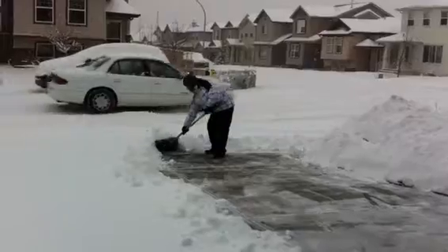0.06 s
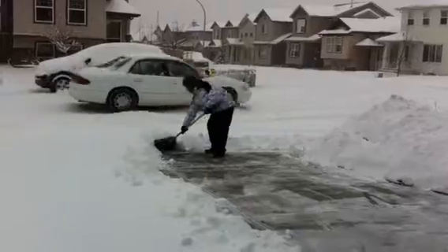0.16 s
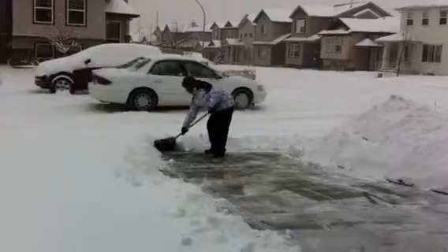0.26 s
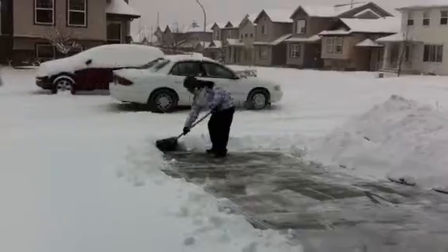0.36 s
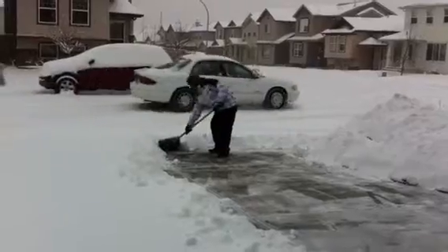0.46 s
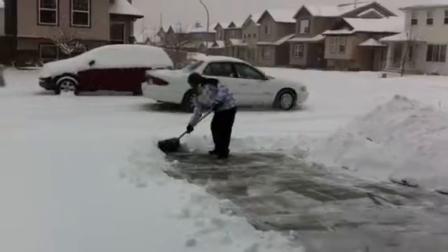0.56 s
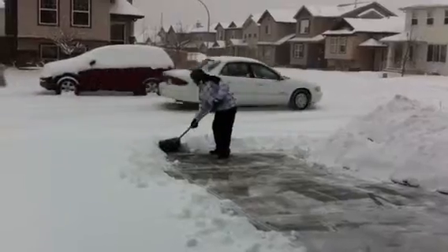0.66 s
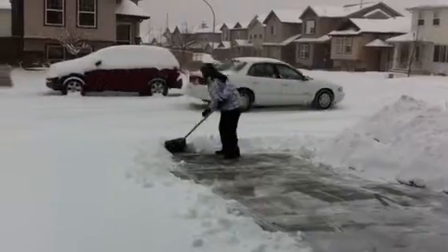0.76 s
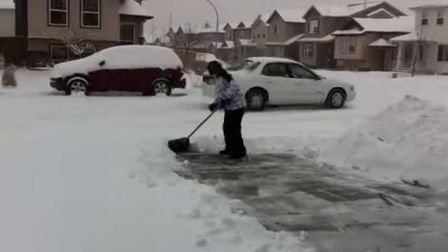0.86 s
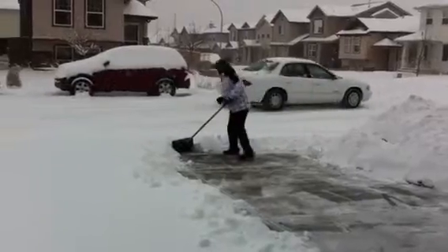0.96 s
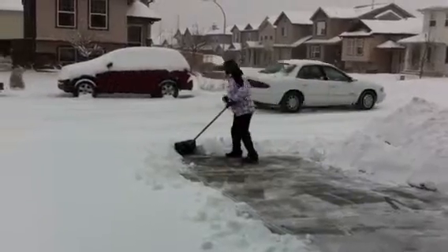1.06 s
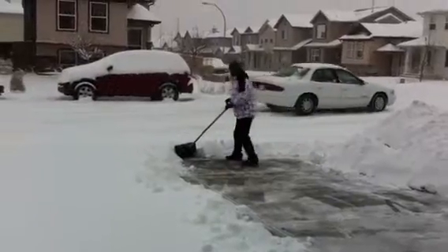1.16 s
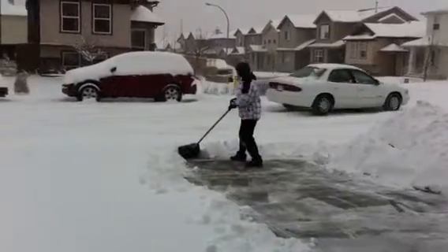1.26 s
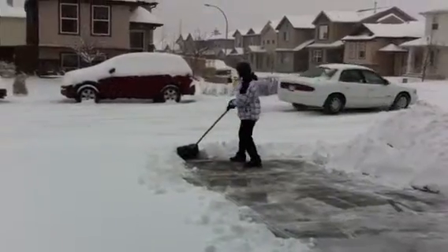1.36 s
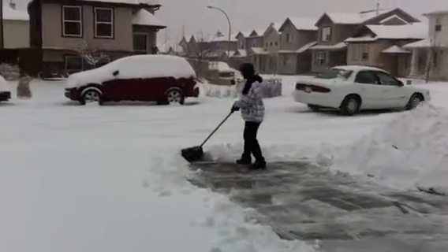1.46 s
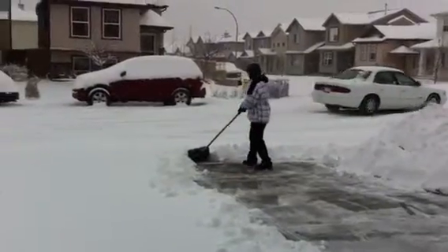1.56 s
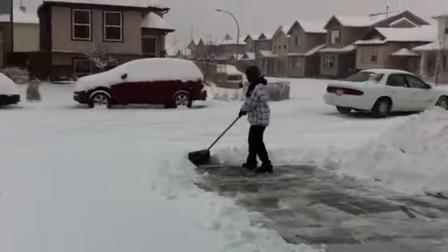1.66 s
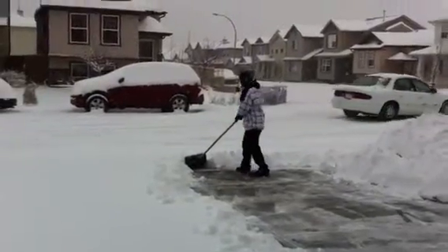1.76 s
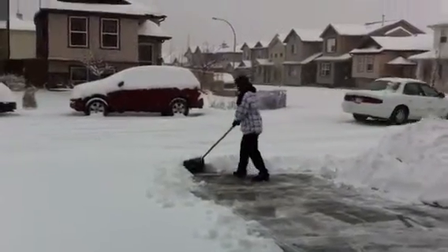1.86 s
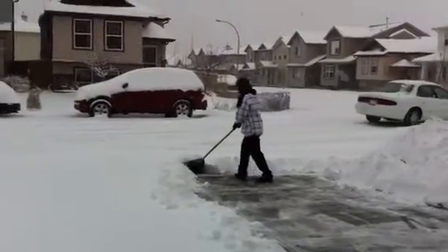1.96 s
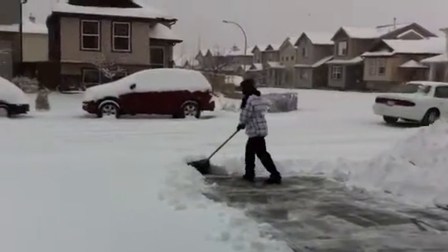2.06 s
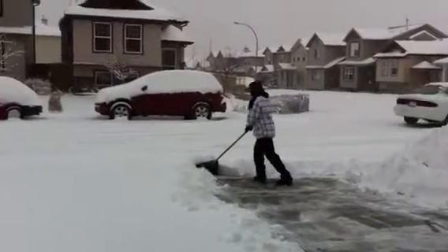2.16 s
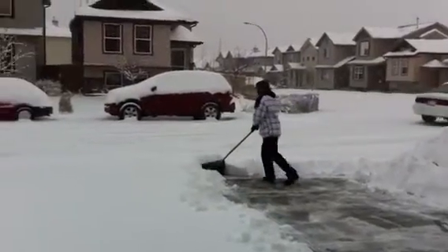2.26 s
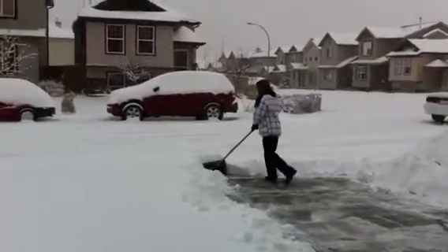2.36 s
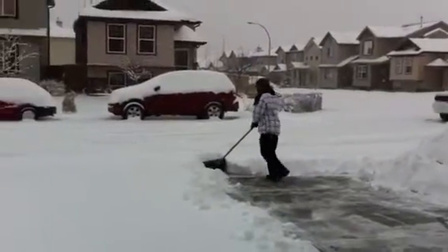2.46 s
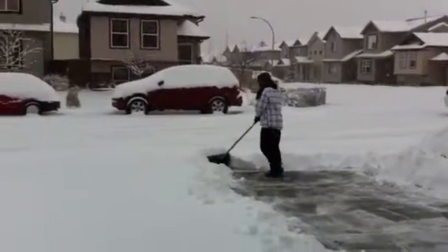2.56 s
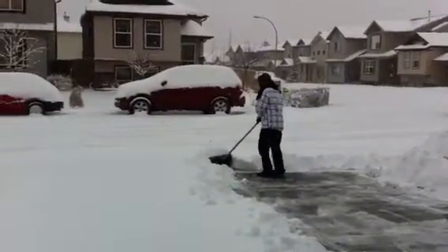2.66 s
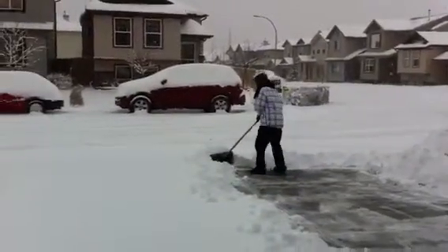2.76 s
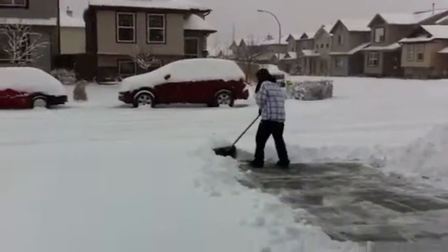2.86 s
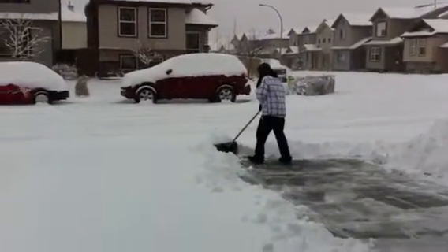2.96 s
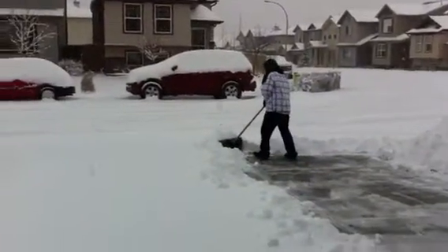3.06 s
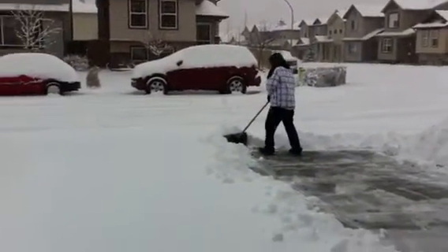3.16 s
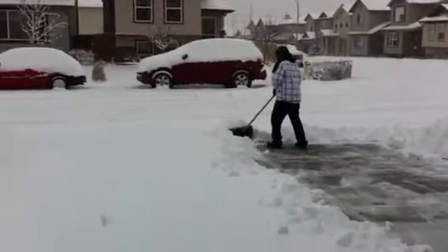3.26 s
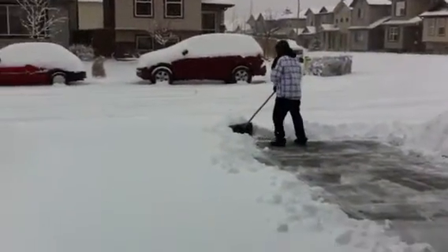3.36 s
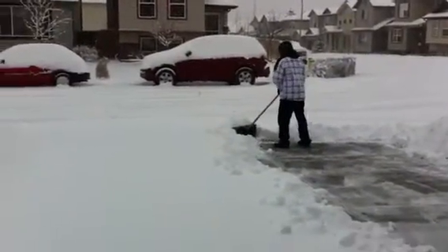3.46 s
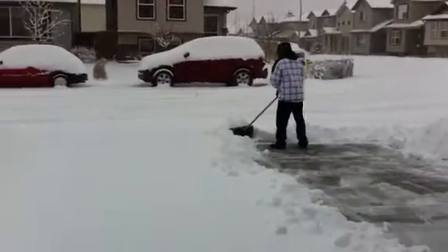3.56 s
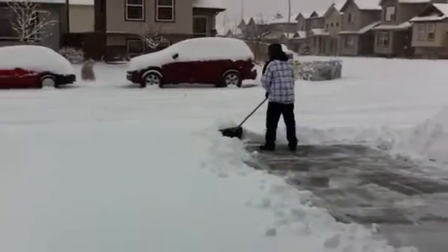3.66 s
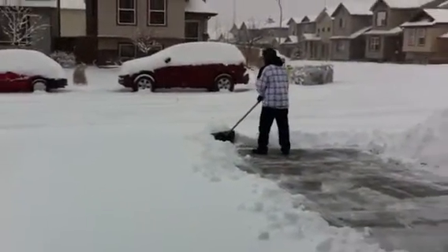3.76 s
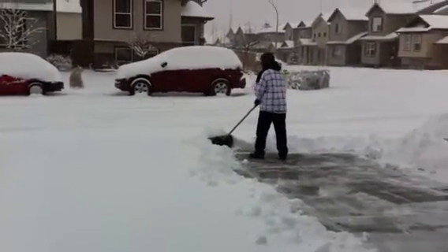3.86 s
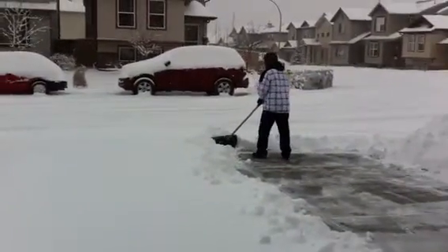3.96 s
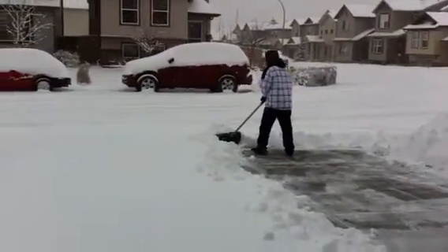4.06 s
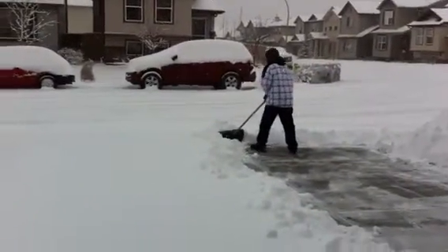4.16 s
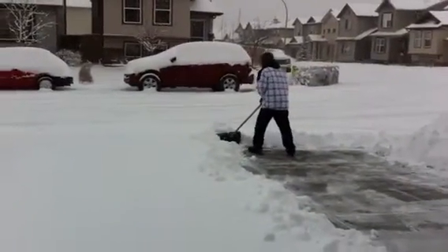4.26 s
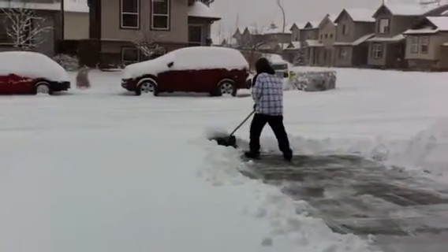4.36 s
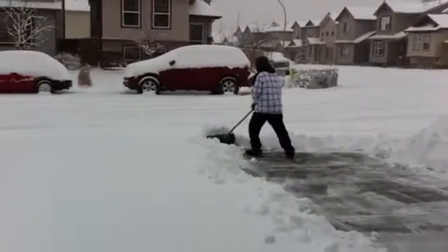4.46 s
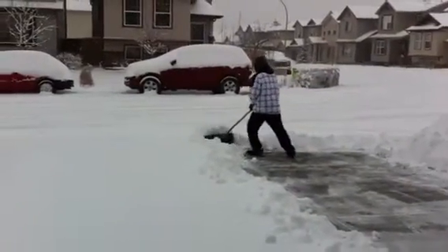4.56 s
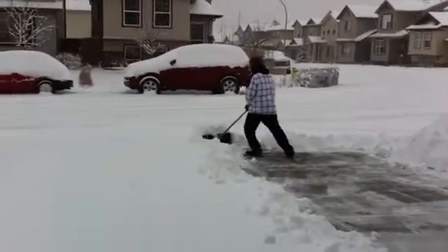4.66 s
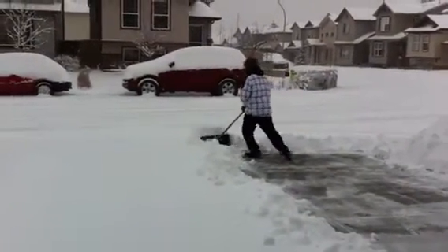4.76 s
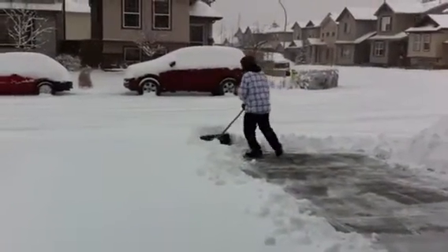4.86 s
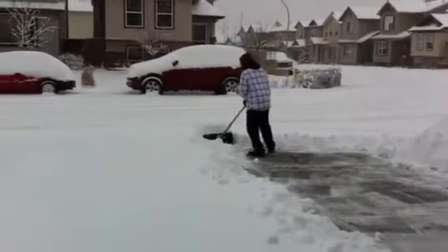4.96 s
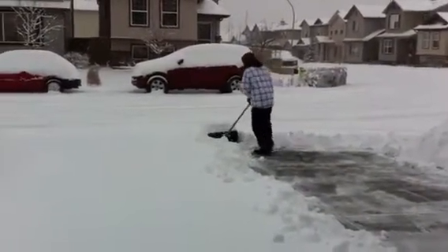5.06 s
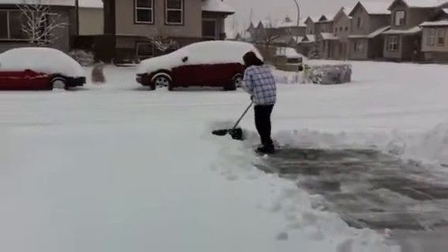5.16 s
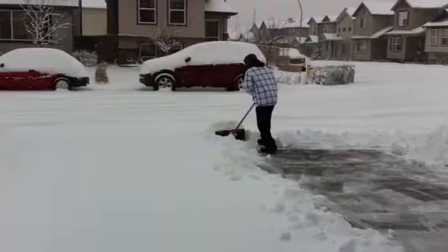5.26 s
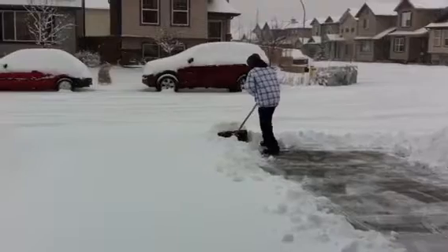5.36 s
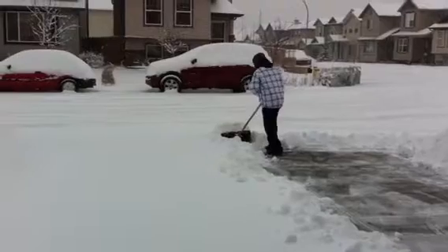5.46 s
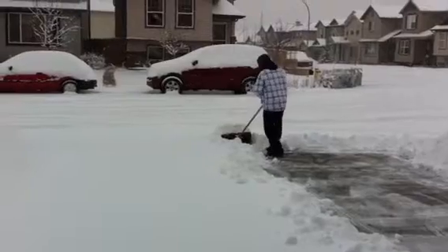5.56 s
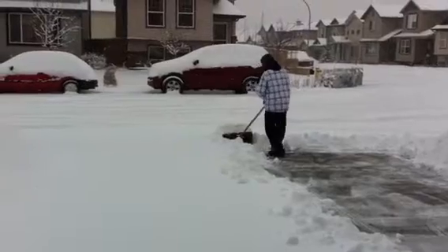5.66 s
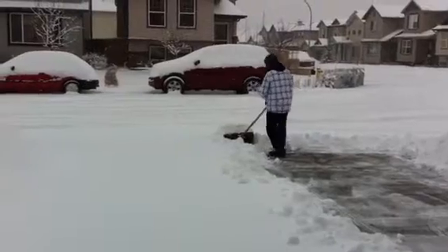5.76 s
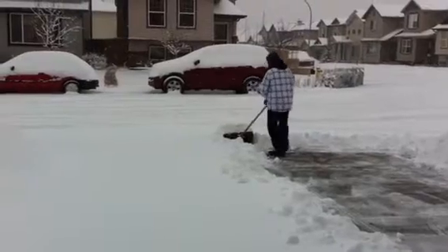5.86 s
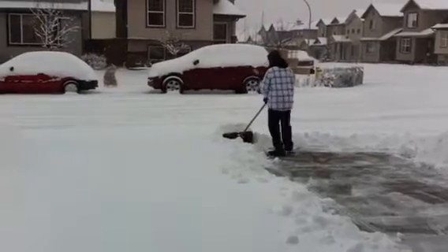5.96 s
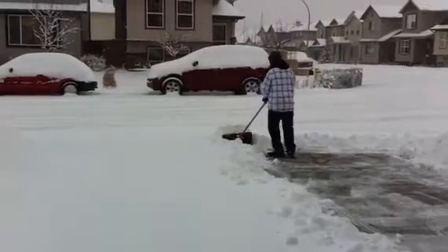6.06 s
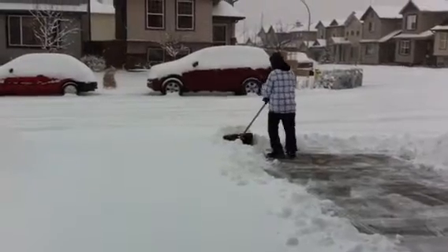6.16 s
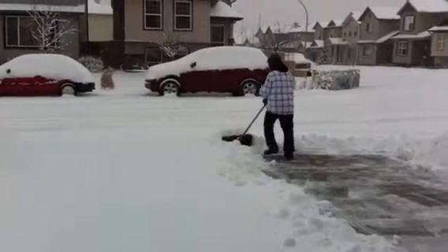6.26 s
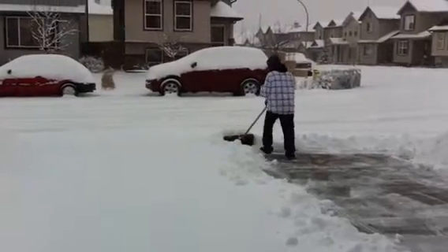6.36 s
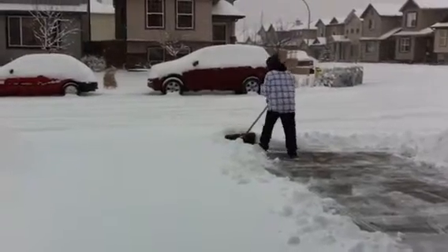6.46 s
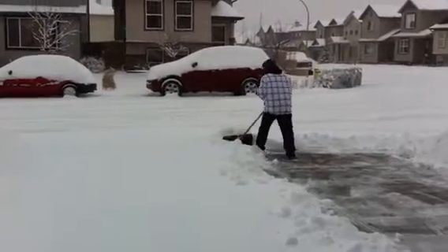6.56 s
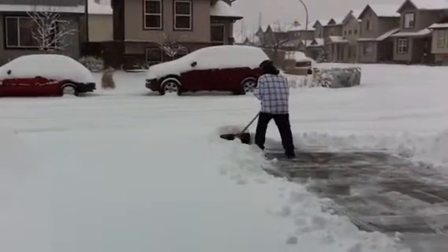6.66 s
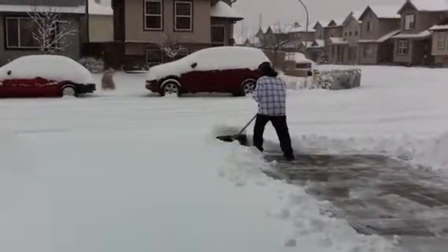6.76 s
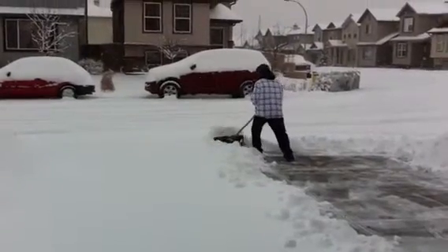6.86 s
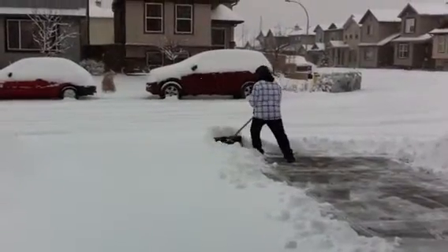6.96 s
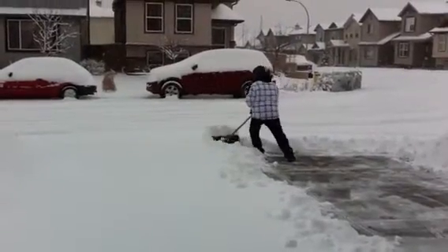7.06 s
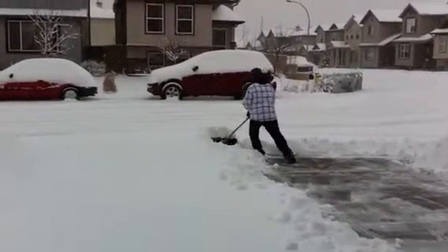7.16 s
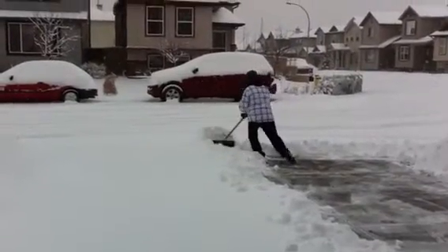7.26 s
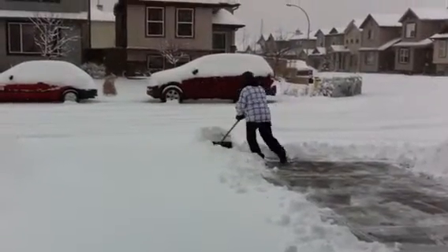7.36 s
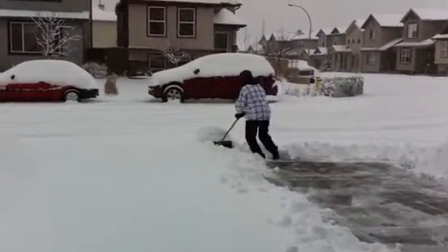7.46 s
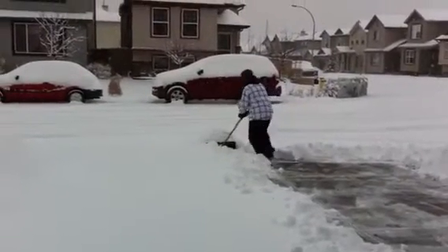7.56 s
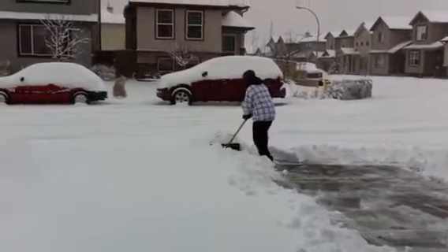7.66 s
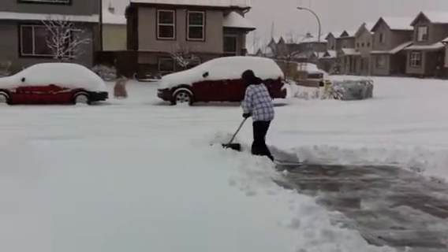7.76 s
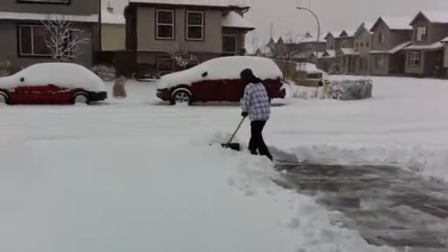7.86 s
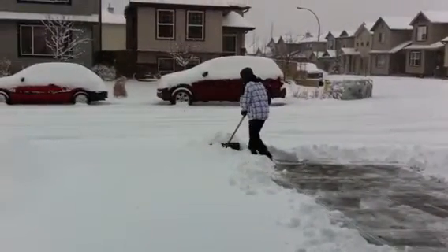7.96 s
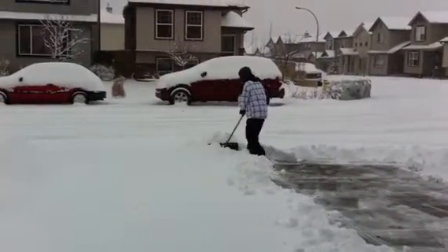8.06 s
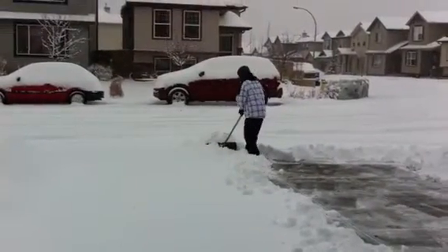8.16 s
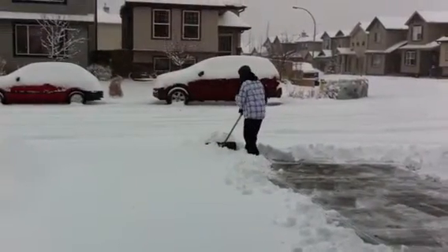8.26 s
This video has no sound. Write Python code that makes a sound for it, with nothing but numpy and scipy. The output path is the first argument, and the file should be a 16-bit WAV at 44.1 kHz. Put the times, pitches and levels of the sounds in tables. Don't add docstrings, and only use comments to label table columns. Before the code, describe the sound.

Outdoors in a snowy residential street, a plastic shovel with a steel edge scrapes rough paving some metres away. A loud, bright stroke is already under way and quickly fades. Small scuffs lead to a longer middle push with knocks and thuds, then a weaker drag. After quiet gaps come two more heavy, laden pushes. A faint street hum, a receding car and small-microphone hiss lie underneath.

```python
import sys
import numpy as np
from scipy import signal
from scipy.fft import rfft, irfft, next_fast_len
from scipy.io import wavfile
from scipy.ndimage import uniform_filter1d, minimum_filter1d, map_coordinates

SR = 44100
rng = np.random.default_rng(int(sys.argv[2]) if len(sys.argv) > 2 else 0)


def volts_from_db(level):
    exponent = np.asarray(level, float) / 20
    return 10 ** exponent


def generate_wav(signal):
    frames = np.transpose(np.atleast_2d(signal))
    scaled = np.clip(frames, -1, 1) * 32767
    pcm = np.round(scaled).astype(np.int16)
    wavfile.write(sys.argv[1], SR, pcm)


N = 366987

# frequency in Hz, width in Hz, height in dB.
RING = [(214, 130, -4), (785, 37, 7.5), (931, 190, 7.5), (1540, 80, 2.5)]
# frequency in Hz, width in Hz, height in dB.
STRIP = [(3890, 170, 3.5), (5160, 1400, 2.5), (5230, 300, 2.5), (6200, 200, 0.5), (8400, 450, 3.5),
         (11000, 630, 2), (13100, 690, 2)]


def scrape():
    # frequency in Hz, level in dB per Hz.
    edge = [(1650, -21), (2800, -1.5), (4290, -2.5), (5570, 0), (6870, -3.5), (8480, -4), (12600, -6.5),
            (15800, -11.5)]
    blade = [(1050, -45.5), (1350, -1), (1550, 2), (2400, 1), (2550, -4), (3200, -40)]
    panel = [(350, -38.5), (550, 2.5), (900, -5.5), (1250, 1), (1700, -35)]
    scoop = [(15, -64), (25, -35), (69, -29.5), (141, -3.5), (172, -1), (240, 3), (419, -9), (550, -10),
             (720, -49), (1210, -120)]
    force = unit(grit(rate=900, spread_db=2.0, clump_db=0.3, life=0.0022))
    levels = contact()
    levels[3] = minimum_filter1d(levels[3], size=1500)
    speed_db = 20 * np.log10(levels[0])
    snow_shares, patches_db = (1.26, 1.34, 1.7, 1.15), (2.0, 2.3, 1.75, 1.9)
    out = np.zeros(N)
    for gain, spectrum, snow, patch_db in zip(levels, (edge, blade, panel, scoop), snow_shares, patches_db):
        drive = patches(force + snow * rng.standard_normal(N), patch_db, wide=5, long=9)
        shaken = coloured(drive, spectrum, RING)
        out += gain * unit(regain(shaken, lambda hz, t: ringing(hz, t, speed_db)))
    return out


def grit(rate, spread_db, clump_db, life):
    slips = rng.random(N) < rate / SR
    sizes = slips * volts_from_db(spread_db * np.minimum(rng.exponential(size=N), 3))
    rasp = signal.lfilter([1], [1, -np.exp(-1 / (life * SR))], sizes)
    clumps = volts_from_db(clump_db * (wobble(25) + 0.89 * wobble(90)))
    return rasp * rng.standard_normal(N) * clumps


def contact():
    # time in s, sliding speed in dB, blade flex in dB, snow load in dB.
    first_pushes = [
        [(2.74, -78, 10, -2), (2.8, -67, 7, 2), (2.94, -68, 8, 4), (3.0, -73, 9, 6)],
        [(1.43, -79, 7, 0), (1.48, -68.5, 12, -3), (1.61, -72.5, 11, -7), (1.66, -82, 12, 0),
         (1.75, -88, 14, 0)],
        [(0.004, -37.5, -6, 0), (0.026, -32.5, -1.5, -11.5), (0.11, -36.5, 6, -5.5), (0.172, -40.5, 1, -7),
         (0.214, -36, -1.5, -10.5), (0.26, -36.5, -2.5, -6.5), (0.422, -57, -1.5, -5), (0.506, -68, -1, -12),
         (0.62, -76, 0, 3)],
        [(1.8, -70, -17, -14), (1.88, -63.5, -5, -2), (1.959, -46.5, -5.5, -1.5), (2.007, -43.5, -4.5, -6.5),
         (2.315, -45, 3.5, -0.5), (2.44, -46, 2.5, -3.5), (2.515, -46.5, 3.5, -9), (2.633, -62, 0.5, -1),
         (2.68, -54, 1, -5)],
        [(3.006, -54, 12, 9), (3.025, -60, 8, 4.5), (3.068, -49.5, -1, -1), (3.174, -56, -0.5, -1.5),
         (3.354, -89, -5, 12)],
    ]
    # time in s, sliding speed in dB, blade flex in dB, snow load in dB.
    later_pushes = [
        [(4.33, -62, 6, 14), (4.345, -51, -15, 3), (4.394, -48, 0, 2), (4.46, -47, 1.5, 0),
         (4.584, -39.5, 0.5, -1.5), (4.654, -48, 2.5, 4), (4.8, -54, 0, -3), (4.88, -58, -1, -1),
         (5.09, -84, 4, 2)],
        [(6.6, -75, -4, 3), (6.68, -58, -1.5, 9), (6.756, -52.5, -2, -0.5), (6.828, -56.5, -1, 7),
         (6.855, -46, 4.5, -2), (6.963, -50, -2, 1.5), (7.001, -45, 0.5, -0.5), (7.17, -50, 0.5, 3),
         (7.52, -68.5, -11, 5.5)],
    ]
    # start in s, edge in dB, blade flex in dB, snow load in dB, fall in dB per s.
    scuffs = [(0.43, -56, -7, -8, 150), (1.07, -65.5, -5, 2, 75), (1.268, -52.5, -17, -12, 79),
              (1.347, -65, 4, 2, 80), (1.474, -53, -10, -16, 400), (1.49, -56.5, -10, -7, 83),
              (1.768, -54.5, -4, -21, 90), (2.662, -51.5, 4.5, -12, 38), (1.895, -57, -10, -10, 60),
              (3.808, -62, 5.5, -18, 200), (7.28, -62, -20, -20, 60), (2.672, -50, 6, -25, 110),
              (3.442, -59, 0.5, -22, 83), (3.48, -59.5, 1.5, -18, 217), (3.774, -62.5, -1, -6, 70),
              (3.788, -57, 4, -12, 162), (4.11, -66.5, -3, 13, 110), (4.05, -67.5, 0, 2.5, 20),
              (4.865, -61.5, 4.5, 4, 102), (5.1, -79, 6, 4, 100), (6.178, -59.5, -6, -16, 160),
              (6.22, -65, -1, -4, 39), (6.34, -68, -1, 4, 71), (7.48, -62, -1, 12, 90),
              (7.85, -73.5, 3, 6, 45), (4.215, -60.5, -5, -12, 32), (7.4, -74, -7, -5, 40)]
    lift_s, attack_s = 0.0041, 0.003
    empty_panel_db = -1.5
    blade_linger = 1
    t = np.arange(N) / SR
    power = np.full((4, N), 1e-12)

    def parts(flex, load):
        panel = -3 + 0.54 * flex + 0.47 * load
        return np.array([0 * flex, flex, panel, load])

    for push in first_pushes + later_pushes:
        s, *controls = np.transpose(push)
        span = slice(round(s[0] * SR), round(s[-1] * SR))
        speed, flex, load = (np.interp(t[span], s, c) for c in controls)
        nearest_end = np.minimum(t[span] - s[0], s[-1] - t[span])
        ends = np.minimum(nearest_end / lift_s, 1)
        power[:, span] += (ends * volts_from_db(speed + parts(flex, load))) ** 2
    for s, db, flex, load, fall_db in scuffs:
        u = t[:SR][:N - round(s * SR)]
        fall = max(fall_db, 10) * np.array([[1], [blade_linger], [1], [1]]) * u
        attack = 1 - np.exp(-u / attack_s)
        shape = volts_from_db(db - fall + [[0], [0], [empty_panel_db], [0]]) * attack
        power[:, round(s * SR):][:, :len(u)] += (volts_from_db(parts(flex, load))[:, None] * shape) ** 2
    return np.sqrt(power)


def ringing(hz, t, speed_db):
    # time in s, centre in Hz, sharpness in dB.
    sing = [(0, 2100, -5), (.2, 1640, 3.5), (1.35, 1720, 12.5), (1.5, 1760, 11.5), (1.6, 1830, 15),
            (1.8, 2000, -1), (2.1, 2210, 6), (2.3, 1740, 0.5), (2.55, 1130, 6), (2.69, 2200, 9),
            (2.8, 2050, 7), (2.95, 1900, 6), (3.2, 1860, 1.5), (3.8, 1900, 11.5), (4.3, 1940, 4),
            (6.2, 2040, 8.5), (6.85, 1870, 5), (7.1, 2250, 1.5), (7.9, 1790, 4)]
    # time in s, share of the strip's peaks.
    bite = [(0, 1.86), (.45, 0.29), (1.3, 1.3), (1.8, 0.93), (1.9, 1.6), (2.0, 1.04), (2.2, 0.81),
            (2.6, 0.33), (3.1, 1.15), (3.6, .4), (4.6, 0.8), (5, 0.39), (8.3, 0.59)]
    # time in s, height in dB.
    upper = [(0, 1), (2.6, 0), (2.68, 8), (2.75, 7), (2.8, -1), (3.4, -3), (3.45, 4), (3.5, 0), (3.76, 6),
             (3.81, 15), (3.84, 0), (6.6, 1), (6.67, 4), (6.72, 0), (7.3, 0), (7.36, -11), (7.5, -5),
             (7.6, -2)]
    middle_db = -50.5
    speed = np.clip(np.interp(t * SR, np.arange(N), speed_db) - middle_db, -15, 20)
    s, centre, sharp = np.transpose(sing)
    note = peaks([(np.interp(t, s, centre), 300, np.interp(t, s, sharp))], hz)
    note = note + peaks([(3000, 530, np.interp(t, *np.transpose(upper)))], hz)
    slope = -0.27 + 0.1072 * speed
    tilt = slope * np.log2(np.maximum(hz, 2600) / 6000)
    return note + tilt + np.interp(t, *np.transpose(bite)) * peaks(STRIP, hz)


def catches():
    # time in s, strip peak in dB, top modes in dB, ping in Hz.
    ticks = [(0.1784, -9.5, -24.5, 5170), (0.2223, -23, -36, 5650), (0.2513, -17.5, -39, 5180),
             (0.4395, -44, -36, 10500), (1.272, -32, -61, 5620), (1.2945, -32, -55, 5680),
             (1.3065, -31, -58, 5730), (1.3592, -35, -59, 5360), (1.48, -35, -36.5, 8400),
             (1.7728, -27, -49, 5770), (1.8265, -37.5, -46, 5810), (1.9006, -38, -46, 5390),
             (1.941, -25.5, -28, 10400), (2.0, -23, -37, 4960), (2.4567, -25, -42, 5480),
             (3.775, -42, -55, 5600), (6.717, -44, -38.5, 12000), (6.978, -42, -38, 13000),
             (3.596, -68, -55, 11600), (2.043, -33, -45, 5000), (2.198, -24, -33, 5400),
             (4.2009, -37, -41.5, 5640), (6.67, -33.5, -58, 2950), (6.8634, -28, -45, 5500),
             (0.044, -21, -35, 5200), (0.028, -23, -34, 5250), (1.283, -35, -60, 5700),
             (1.4805, -35, -45, 5720), (4.58, -25, -36, 5700), (4.54, -27, -40, 5300),
             (6.1866, -54, -70, 4800), (6.993, -20.5, -28.5, 11000), (7.014, -36, -30, 10700),
             (7.1673, -24, -33, 4930), (7.2452, -33, -38, 4800), (7.4094, -64, -43.5, 11300)]
    # time in s, strip peak in dB, top modes in dB, ping in Hz.
    snaps = [(4.1718, -21.5, -48, 4500), (2.1232, -30, -24, 12600), (1.7675, -34, -46, 8600),
             (1.7805, -37, -46, 8500), (1.9354, -33, -28, 10600), (1.95, -29, -40, 5700),
             (1.973, -28, -40, 5500), (4.196, -46, -50, 5200), (6.748, -34, -48, 4950),
             (6.9775, -33, -38, 4970), (7.0135, -26, -40, 5500), (2.6398, -55, -44, 13200),
             (2, -45, -60, 3700), (6.7175, -38, -50, 6000), (6.687, -42, -55, 4900),
             (1.984, -34, -40, 5300)]
    # time in s, blade peak in dB, strip in dB, ping in Hz.
    knocks = [(0.1152, -34.5, -17, 2270), (0.4414, -41, -55, 560), (1.9245, -40.5, -30, 1840),
              (1.9604, -34.5, -25, 2380), (2.383, -31.5, -39, 1780), (2.461, -31.5, -40, 1900),
              (2.4695, -28.5, -40, 1740), (2.39, -32, -42, 1600), (2.296, -35.5, -45, 720),
              (2.42, -35.5, -45, 2000), (6.704, -41, -55, 904), (6.659, -46, -55, 2200),
              (7.016, -37, -45, 1400), (4.203, -47, -60, 2200), (3.006, -42, -55, 1900),
              (1.968, -36, -45, 2300), (2.268, -32, -42, 990), (2.6825, -36, -41, 2390),
              (2.6994, -36, -39, 2300), (3.0134, -33, -48, 1850), (3.794, -43, -55, 1830),
              (3.447, -42, -55, 1840), (4.5, -46, -46, 806), (4.1718, -44, -60, 2020),
              (4.3406, -38.5, -44, 1930), (4.3672, -38, -43, 1900), (4.4643, -33.5, -33, 1760),
              (4.8645, -31, -47, 1806), (6.3622, -49.5, -46, 1950), (6.669, -41.5, -48, 886),
              (4.376, -38, -44, 2310), (6.7161, -42, -43, 1000), (6.747, -36.5, -40, 1860),
              (6.8375, -31.5, -36, 1840), (6.8634, -29.5, -24.5, 995), (6.8917, -33, -37, 1810),
              (7.0902, -38, -33, 2370), (7.109, -35.5, -41, 1610), (7.1671, -34.5, -39, 1860),
              (7.8574, -56, -65, 1980), (7.859, -57, -70, 1300), (5.731, -50, -70, 830),
              (4.685, -39, -36, 1900)]
    long_t60, snap_t60 = 0.017, 0.007
    spill_db = -17.5
    rows = [(s, strip, strip + spill_db, top, long_t60, hz) for s, strip, top, hz in ticks]
    rows += [(s, strip, strip + spill_db, top, snap_t60, hz) for s, strip, top, hz in snaps]
    rows += [(s, strip, blade, strip + spill_db, long_t60, hz) for s, blade, strip, hz in knocks]
    t = np.arange(3000) / SR
    kicks = np.zeros((4, N + len(t)))
    for s, strip_db, blade_db, top_db, t60, hz in rows:
        fade = volts_from_db(-60 * t / max(t60, 0.003))
        burst = rng.standard_normal(len(t)) * fade * (1 - np.exp(-t / (0.01 * t60)))
        burst *= np.linalg.norm(fade) / np.linalg.norm(burst)
        if hz <= 2800:
            ping_db = blade_db + 8.0
        elif hz <= 7500:
            ping_db = strip_db - 2.5
        else:
            ping_db = top_db - 2.0
        ping = np.sin(2 * np.pi * hz * t) * fade * (1 - np.exp(-t / (0.14 * t60)))
        shakes = volts_from_db([[blade_db + 11.5], [strip_db + 0.5], [top_db + 3.5]]) * burst
        kicks[:, round(s * SR):][:, :len(t)] += np.vstack([shakes, volts_from_db(ping_db) * ping])
    blade_spectrum = [(60, -54), (500, -15), (900, -12.0), (2400, -5), (3200, -31.0)]
    strip_spectrum = [(2200, -22), (3000, -9), (7000, -7.5), (8500, -32.0)]
    top_spectrum = [(6500, -38), (7800, -4.5), (12000, -3.0), (15500, -14), (17000, -42)]
    blade = coloured(kicks[0, :N], blade_spectrum, RING + [(1900, 190, 3.0)])
    strip = coloured(kicks[1, :N], strip_spectrum, STRIP + STRIP[2:3])
    top = coloured(kicks[2, :N], top_spectrum, STRIP)
    return blade + strip + top + kicks[3, :N]


def bumps():
    # time in s, peak in dB, pitch in Hz, decay time t60 in s.
    thuds = [(0.204, -31, 233.7, 0.17), (0.433, -41, 296, 0.037), (2.155, -29, 237, 0.068),
             (2.4, -23, 213, 0.03), (2.664, -26, 277, 0.062), (4.111, -32, 169, 0.046),
             (4.548, -35, 177, 0.077), (4.6, -31, 242, 0.07), (5.339, -46, 233, 0.074),
             (5.36, -47.5, 110, 0.1), (5.728, -45, 800, 0.027), (6.35, -48, 246, 0.09),
             (6.415, -46.5, 268, 0.065), (6.31, -49, 140, 0.1), (7.5, -43.5, 120, 0.12),
             (2.664, -34, 142, 0.065), (6.709, -35, 232, 0.044), (6.861, -28, 180, 0.064),
             (6.898, -27.5, 168, 0.074), (7.113, -31, 183, 0.2)]
    t = np.arange(SR // 4) / SR
    out = np.zeros(N + len(t))
    for s, db, hz, t60 in thuds:
        low = np.sin(2 * np.pi * hz * t * (1 - 0.3 * t))
        drum = low + 0.3 * np.sin(2 * np.pi * 1.63 * hz * t)
        attack = 1 - np.exp(-t / 0.003)
        out[round(s * SR):][:len(t)] += volts_from_db(db + 2 - 60 * t / t60) * attack * drum
    return coloured(out[:N], [(30, -25), (90, -10.5), (170, -4.5), (20000, 1)])


def fronts(x):
    # frequency in Hz, decay time t60 in s.
    decay = [(200, 0.54), (2000, 0.56), (10000, 0.27)]
    hz, t, z = signal.stft(rng.standard_normal(SR // 2), SR, nperseg=256)
    tail = signal.istft(z * volts_from_db(-60 * t / along(decay, hz)[:, None]), SR, nperseg=256)[1]
    late = np.pad(x, (700, 0))
    return signal.fftconvolve(late, tail / np.linalg.norm(tail))[:N]


def street():
    # frequency in Hz, level in dB per Hz.
    hum_spectrum = [(20, -46), (30, -31), (70, -15), (120, -4.5), (240, 1), (450, -6), (800, -8),
                    (1500, -17), (2600, -24.5), (4000, -43.5)]
    tyre_spectrum = [(400, -49), (900, -4), (1700, 4), (3000, -11), (5500, -3), (9000, -28)]
    t = np.arange(N) / SR
    hum = patches(coloured(rng.standard_normal(N), hum_spectrum), 0.73, wide=3, long=30)
    tyres = patches(coloured(rng.standard_normal(N), tyre_spectrum), 1.4, wide=5, long=20)
    engine = volts_from_db(-63.5 - 1.5 * t)
    low = np.hypot(volts_from_db(-67.5), engine) * volts_from_db(0.8 * wobble(8) + 0.4 * wobble(1.61))
    return low * unit(hum) + volts_from_db(-66.5 - 6 * t) * unit(tyres)


def unit(x):
    return x / np.sqrt(np.mean(x ** 2) + 1e-20)


def along(points, hz):
    f, v = np.transpose(points)
    return np.interp(np.log(hz + 1), np.log(f + 1), v)


def wobble(rate):
    knots = rng.standard_normal(int(N * rate / SR) + 4)
    return map_coordinates(knots, [np.arange(N) * rate / SR])


def peaks(ring, hz):
    return sum(top * w * w / (w * w + 4 * (hz - c) ** 2) for c, w, top in ring)


def coloured(x, spectrum, ring=()):
    m = 2 * next_fast_len(N // 2 + 8192)
    hz = np.fft.rfftfreq(m, 1 / SR)
    db = along(spectrum, hz) + peaks(ring, hz)
    cep = irfft(np.log(volts_from_db(db)), m)
    cep[1:m // 2] *= 2
    cep[m // 2 + 1:] = 0
    return irfft(rfft(x, m) * np.exp(rfft(cep)), m)[:N]


def regain(x, db):
    hz, t, z = signal.stft(x, SR, nperseg=256)
    return signal.istft(z * volts_from_db(db(hz[:, None], t)), SR, nperseg=256)[1][:N]


def patches(x, db, wide, long):
    def spots(hz, t):
        field = uniform_filter1d(rng.standard_normal((len(hz), len(t))), wide, 0)
        return db * unit(uniform_filter1d(field, long, 1))
    return regain(x, spots)


def scene():
    shovel = scrape() + catches() + bumps()
    return (shovel + volts_from_db(-12.0) * fronts(shovel) + street())[None]


def band_limit(x):
    return signal.sosfilt(signal.butter(12, 15870, fs=SR, output="sos"), x)


def record(dry):
    # frequency in Hz, level in dB per Hz.
    hiss_spectrum = [(300, -35), (1200, 2), (3000, 1.5), (8000, -2), (13000, -1), (15800, 2), (17000, -67)]
    hiss = volts_from_db(-71 + 0.8) * unit(coloured(rng.standard_normal(N), hiss_spectrum))
    band = np.fft.rfftfreq(N, 1 / SR) < 15840
    is_open = np.arange(N) > 0.0095 * SR
    heard = irfft(rfft(dry + hiss) * band, N) * is_open
    return band_limit(heard)


dry = scene()
out = record(dry)
generate_wav(out)
```